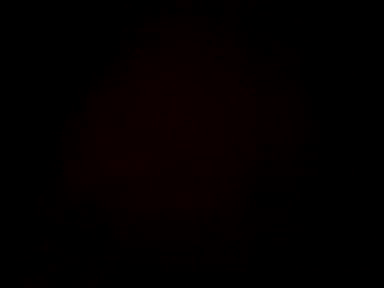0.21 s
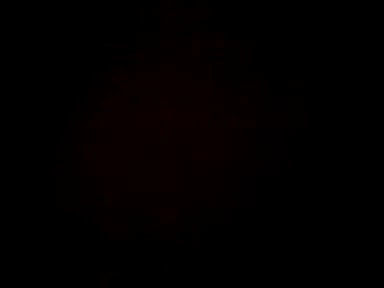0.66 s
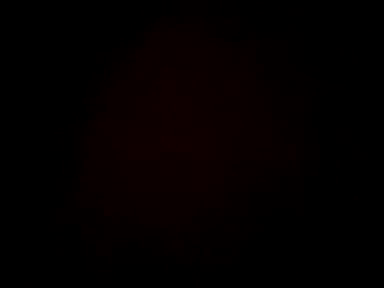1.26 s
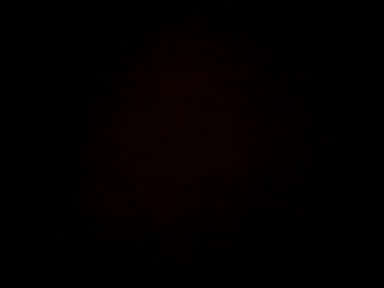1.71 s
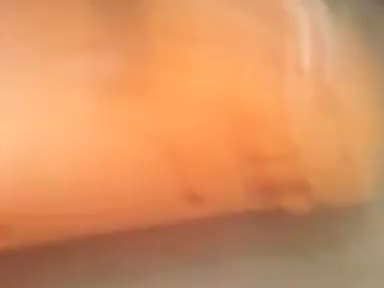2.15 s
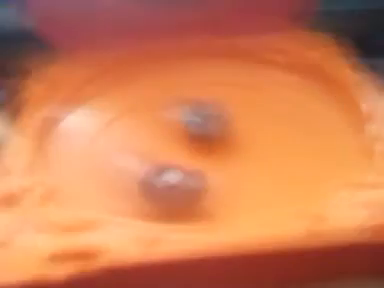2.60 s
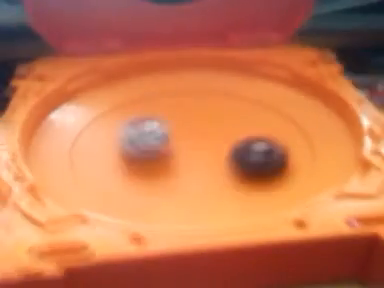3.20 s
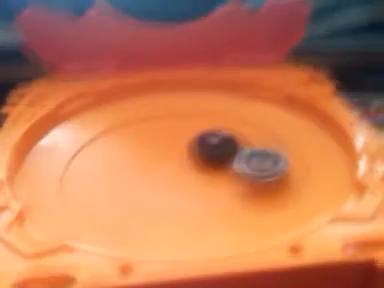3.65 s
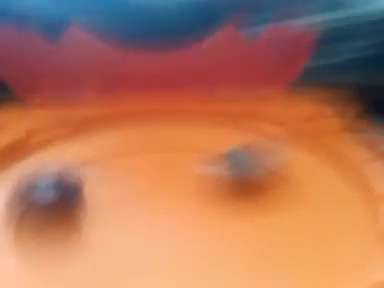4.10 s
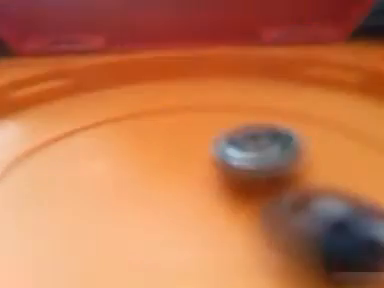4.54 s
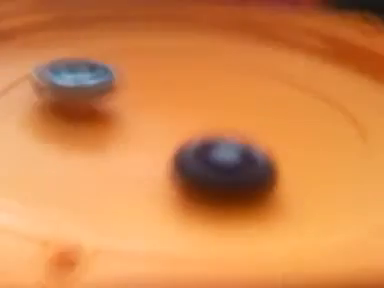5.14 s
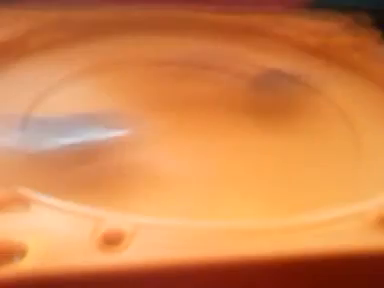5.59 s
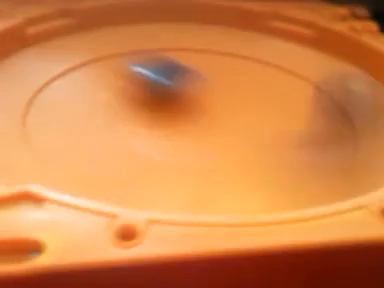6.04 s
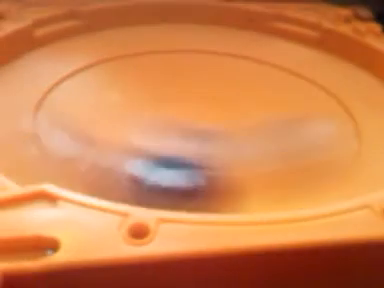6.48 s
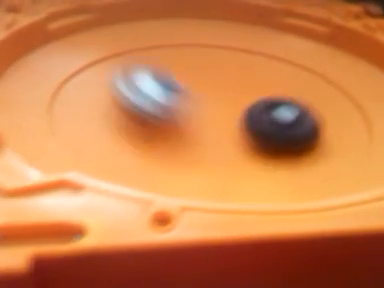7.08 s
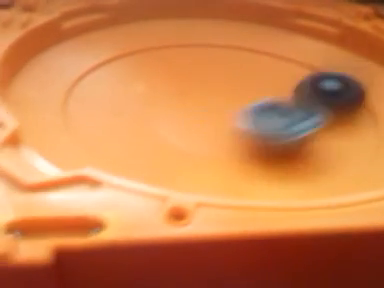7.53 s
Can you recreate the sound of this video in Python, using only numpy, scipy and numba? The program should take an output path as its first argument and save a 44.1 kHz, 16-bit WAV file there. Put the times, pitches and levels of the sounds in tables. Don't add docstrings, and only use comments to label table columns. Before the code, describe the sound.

After a near-silent half second with faint launcher clicks and a short ripcord zip, two metal tops slam into a thin plastic bowl. Dense, hollow clattering lasts about two seconds, then eases into light bounces and a low fluttering whirr. Metal rims clash again in sharp bursts, heaviest past the middle, before rolling with small taps. Small dry room, close muffled microphone, loud hits clipping.

```python
import sys
import numpy as np
from scipy import signal
from scipy.fft import rfft, irfft
from scipy.io import wavfile
from scipy.ndimage import uniform_filter1d
from numba import njit

SR = 44100
rng = np.random.default_rng(int(sys.argv[2]) if len(sys.argv) > 2 else 0)


def master(y):
    cut = np.clip(np.atleast_2d(y).T, -1, 1)
    pcm = np.round(cut * 32767)
    wavfile.write(sys.argv[1], SR, pcm.astype(np.int16))


def volts(x):
    e = np.asarray(x, float) / 20
    return 10 ** e


N = 342657


def level(x, db):
    return x * volts(db) / np.sqrt(np.mean(x ** 2))


def curve(table):
    s, *columns = np.transpose(table)
    return [np.interp(np.arange(N) / SR, s, column) for column in columns]


def ring(x, hz, width):
    hz_in_range = np.clip(hz, 50, 8000)
    return signal.lfilter(*signal.iirpeak(hz_in_range, max(hz / width, .3), fs=SR), x)


def coloured(points):
    hz, db = np.transpose(points)
    f = np.arange(1, N // 2 + 2) * SR / N
    gain = volts(np.interp(np.log(f), np.log(hz), db))
    return level(irfft(rfft(rng.standard_normal(N)) * gain, N), 0)


def walk(rate):
    k = int(SR / rate)
    held = np.repeat(rng.standard_normal(N // k + 1), k)
    return 1.3 * uniform_filter1d(uniform_filter1d(held, k), k)[:N]


@njit
def svf(x, hz, width):
    y, b, l = np.empty(len(x)), 0., 0.
    for i in range(len(x)):
        g, k = np.tan(np.pi * hz[i] / SR), width / hz[i]
        v = (b + g * (x[i] - l)) / (1 + g * (g + k))
        b, l, y[i] = 2 * v - b, l + 2 * g * v, k * v
    return y


LAUNCH_S = .61
MEET_S = 2.6

# start in seconds, peak in dB, bowl ring in Hz, metal share in dB, contact length in ms.
SLAMS = [(.619, 4.5, 404, -3, 14), (.657, 2, 613, -4.5, 4.7), (.686, -8, 276, -5.5, 9.3),
         (1.003, -2.2, 700, -4, 14.4), (1.061, 2.5, 670, -3.5, 13), (1.079, 5, 922, -11, 19),
         (1.14, -4, 324, -29, 12.5), (1.212, -1.5, 400, -15, 9.4), (1.232, 4.5, 720, -6, 18),
         (1.254, 1, 1010, -20.5, 9.2), (1.4, 2, 820, -20, 17), (1.442, 5.5, 703, -20, 9.7),
         (1.538, -6, 625, -3, 15), (1.581, 1.5, 730, -0.9, 9.9), (1.649, 3, 904, -11.5, 19.8),
         (1.672, -5, 600, 4, 3.8), (1.785, -1.4, 480, -34.5, 10), (1.877, -11, 382, -18, 27),
         (1.93, 4.5, 613, 6.5, 21.4), (2.11, -3, 493, -3.5, 14.8), (2.266, -2.5, 404, -9, 12.9),
         (2.347, -6, 1096, 3, 9.2), (2.353, 4.5, 953, 0, 9.7), (2.485, -3.5, 705, -0.5, 13)]
# start in seconds, peak in dB, bowl ring in Hz, metal share in dB, contact length in ms.
CLASHES = [(3.903, -5.5, 450, 1, 7.1), (3.966, -3.1, 567, 1, 11.9), (4.472, -7, 403, 9.5, 7.7),
           (4.535, -1, 1000, -8, 9.5), (4.584, -5.5, 990, -0.5, 7.1), (4.622, -8, 362, -3, 14),
           (4.83, -4, 480, 1.5, 7.1), (5.298, -4.5, 490, -12, 10), (5.338, -6, 555, 0.5, 16.5),
           (5.368, -1.3, 1007, -15, 13), (5.397, 0, 537, 5, 9.5), (5.448, -4.5, 434, 5.5, 11.6),
           (5.48, 2.5, 554, -12.5, 4.7), (5.571, -0.5, 561, -22, 5.1), (5.582, -1, 590, -20.5, 7.6),
           (5.665, -.5, 560, -9.5, 8), (5.793, -3.5, 408, 3, 11), (5.837, -3, 1256, -10, 5.8),
           (5.882, -6.5, 907, -3.5, 24), (5.9, 1.5, 895, -22.5, 11), (5.98, -4, 536, -26, 11.2),
           (6.08, -4, 434, -5, 10.2), (6.1, 2, 556, -20.5, 10.2), (6.181, -0.15, 835, -15.5, 8)]
# start in seconds, peak in dB, bowl ring in Hz, metal share in dB.
SKIPS = [(0.648, -18.5, 1124, -12), (.722, -6.5, 694, -35), (.759, -4.5, 676, -1.5),
         (.803, -10.5, 720, -12), (.823, -11, 630, -27), (.859, -4.5, 734, -27), (.886, -4.5, 706, -11),
         (.91, -10.5, 720, -17), (.946, -13.5, 720, -26), (1.198, -19.5, 910, 6.5),
         (1.037, -7.5, 372, -11.5), (1.047, -10, 793, -31.5), (1.273, -6, 463, -19), (1.288, -13, 960, -7),
         (1.316, -9.5, 457, -6), (1.344, -6, 327, -1.5), (1.374, -10, 840, -3), (1.476, -5.5, 720, -22),
         (1.595, -1.5, 1110, -12), (1.616, -5.5, 902, -10), (1.625, -7.5, 877, -2.5), (1.703, -7.5, 675, 9),
         (1.724, -4, 793, -14), (1.758, -7.5, 450, -19), (1.812, -8.5, 443, -29), (1.851, -14, 448, -25.5),
         (1.967, -11, 1380, 5), (1.996, -7.5, 475, -24), (2.054, -17, 620, -5), (2.148, -18, 430, -3)]
# start in seconds, peak in dB, bowl ring in Hz, metal share in dB.
REBOUNDS = [(2.702, -15, 1414, 19), (3.934, -9.5, 400, -5.5), (4.016, -8, 535, -20), (4.06, -5, 368, -39),
            (4.118, -8, 368, -30), (4.498, -12, 316, -6), (4.669, -10, 395, -5.5), (4.699, -13, 408, -2.5),
            (4.876, -8.5, 528, -2.5), (4.926, -20.5, 450, 2), (5.406, -2, 540, 0.5), (5.463, -4.5, 536, 1),
            (5.512, -7.5, 330, -3.5), (5.705, 2, 519, -3), (5.717, -12, 358, -3), (5.849, -3, 490, 2.5),
            (5.99, -.8, 557, -7), (6.025, 1, 586, -9), (6.217, -3, 557, -13), (6.238, -15, 380, 1.5),
            (6.27, -11.5, 365, -12), (6.321, -8.5, 1050, -14), (6.35, -7, 930, -8), (6.566, -9.5, 450, -14),
            (6.699, -13, 560, -8.5), (7.155, -17, 450, -10), (7.291, -15.5, 392, -33),
            (7.45, -14.5, 412, 6), (7.49, -6.5, 544, -8), (7.596, -9.5, 450, -7)]
# start in seconds, peak in
# dB, bowl ring in Hz, metal share in dB.
BOUNCES = [(2.571, -9, 400, -11), (2.63, -9, 430, -9), (2.676, -13, 447, -11), (2.715, -15, 400, -11),
           (2.742, -14, 447, -14), (2.757, -20, 380, -16), (2.773, -18, 466, -14), (2.798, -17, 528, -11),
           (2.819, -24, 455, -16), (2.96, -22, 350, -16), (2.979, -25, 900, -16), (2.997, -24, 950, -16),
           (3.024, -25, 400, -16), (3.062, -28, 514, -14), (3.115, -29, 400, -16), (3.428, -25, 441, -20),
           (3.633, -16, 439, -11), (3.665, -16, 400, -11), (3.696, -15, 431, -11), (3.719, -16, 433, -11),
           (3.743, -19, 380, -11), (3.762, -18, 441, -11), (4.163, -13, 423, -14), (4.192, -15, 366, -14),
           (4.213, -14, 441, -14), (4.233, -15, 361, -14), (4.252, -15, 431, -14), (4.275, -17, 366, -12),
           (4.435, -21, 400, -11), (4.911, -12, 412, -13), (4.949, -14, 400, -15), (4.957, -14, 450, -15),
           (4.987, -13, 415, -17), (5.021, -14, 428, -17), (5.051, -17, 380, -18), (5.124, -20, 371, -11),
           (5.282, -19, 380, -20), (6.752, -23, 350, -8), (7.325, -21, 330, -11), (7.363, -23, 388, -11)]
# start in seconds, peak in dB, bowl ring in Hz.
TOUCHES = [(2.839, -15.5, 684), (2.877, -16, 636), (2.915, -14, 398), (2.942, -22.5, 318),
           (4.307, -18.5, 390), (4.328, -16.5, 497), (4.397, -18, 486), (4.75, -17, 630),
           (4.772, -18.5, 484), (6.3, -17.5, 405), (6.377, -12.5, 390), (6.413, -12.5, 560),
           (6.423, -14, 570), (6.447, -13.5, 380), (6.476, -22, 400), (6.501, -13.5, 580),
           (6.541, -10.5, 380), (6.599, -14, 450), (6.727, -18, 340), (7.003, -23, 1240),
           (6.969, -23, 1200), (7.143, -24.5, 330), (7.178, -25, 368), (7.202, -21.5, 415),
           (7.258, -22.5, 396), (7.525, -15, 420), (7.543, -16.5, 472), (7.624, -17.5, 460),
           (7.648, -20.5, 350), (7.737, -23, 390)]
# start in seconds, peak in dB, ring of the struck spot
# in Hz.
GRAZES = [(.751, -22, 2000), (0.783, -23, 2870), (0.972, -25, 1600), (1.179, -22, 2000),
          (1.305, -12.5, 2150), (1.334, -28, 2200), (1.428, -5, 700), (1.498, -37, 1500),
          (3.468, -28, 2120), (3.635, -24, 3200), (5.353, -4.5, 2590), (5.544, -22.5, 2800),
          (6.202, -15, 2860), (6.583, -19.5, 2460), (6.622, -27, 3200), (6.803, -30, 3000),
          (7.154, -19, 3140), (7.18, -28, 2300), (7.452, -15, 3170), (7.547, -25, 2280), (5.339, -11, 2550),
          (5.398, -9, 1950), (5.408, -10, 2000), (5.449, -11, 2500), (5.667, -9, 2200), (5.838, -10, 2300),
          (4.472, -11, 2400), (4.832, -13, 2250), (3.969, -10, 2500), (2.798, -22, 2000), (5.802, 1, 1400),
          (1.45, 0, 800), (1.155, -12, 1100), (1.57, -16, 1900), (1.835, -17, 900), (1.686, -11, 1300),
          (6.986, -26, 1250), (7.017, -26, 1250), (6.825, -33, 3000), (6.845, -32, 2800), (7.484, -16, 900),
          (6.385, -20, 2300), (3.485, -29, 1100), (3.497, -33, 2100), (3.57, -30, 2050), (.895, -8, 750),
          (1.64, -14, 900), (6.188, -2, 850)]
# start in seconds, peak in dB, metal share in dB.
CLICKS = [
    (0.408, -19, -4),
    (0.459, -26.5, -3),
    (0.486, -29, -3),
    (0.522, -12.5, -44),
    (.55, -20, -1),
    (0.569, -26, -4),
    (0.6, -11, 15.5),
]
CASE_HZ = 820
CLICK_MS, SKIP_MS, REBOUND_MS, BOUNCE_MS, TOUCH_MS, GRAZE_MS = 6.7, 9.5, 8.57, 7.5, 9.3, 9
TOUCH_METAL_DB, GRAZE_METAL_DB = -11, -7.5


def contacts():
    rows = [(s, db, CASE_HZ, metal_db, CLICK_MS) for s, db, metal_db in CLICKS]
    rows += list(SLAMS) + list(CLASHES)
    rows += [(*row, SKIP_MS) for row in SKIPS]
    rows += [(*row, REBOUND_MS) for row in REBOUNDS]
    rows += [(*row, TOUCH_METAL_DB, TOUCH_MS) for row in TOUCHES]
    rows += [(*row, GRAZE_METAL_DB, GRAZE_MS) for row in GRAZES]
    rows += [(*row, BOUNCE_MS) for row in BOUNCES]
    return rows


# frequency in Hz, width in Hz, level in dB.
BOWL = [(235, 30, -14), (450, 130, 7.5), (720, 610, 1.5), (1000, 150, -4), (1350, 280, -14)]


def plate_ring(chatter, s, hz, scatter):
    plate = ring(ring(chatter, hz, 0.29 * hz), hz, 0.93 * hz)
    if s > LAUNCH_S:
        dull = ring(chatter, 800, 1900)
        for (f, width, db), c in zip(BOWL, scatter):
            plate = plate + volts(-13) * volts(db + 6.7 * c) * ring(dull, f, width)
    return level(plate, 0)


PUSH_DB = (-10, -16)


def bowl_push(chatter, s):
    if s <= LAUNCH_S:
        return 0
    return level(ring(ring(chatter, 210, 390), 280, 600), PUSH_DB[int(s > MEET_S)])


# frequency in Hz, width in Hz, level in dB.
RIM = [(1813, 260, 24), (2106, 400, 15), (2600, 450, 10), (2980, 250, 10), (3470, 200, -20)]


def rim_ring(chatter, s, metal_db, scatter):
    lift = (1.187 if s > MEET_S else 1) * (1 + .04 * scatter[7])
    metal = 0
    for (f, width, db), c in zip(RIM, scatter[8:]):
        metal = metal + volts(db + 3.0 * c) * ring(chatter, f * lift, width)
    return level(ring(metal, 2200, 3500), metal_db - 3.0)


def blows():
    rows, places = contacts(), 5
    out, t = np.zeros((places, N + 2048)), np.arange(2048) / SR
    for n, (s, db, hz, metal_db, ms) in enumerate(rows):
        noise, scatter = rng.standard_normal(2048), rng.standard_normal(16)
        u = t / (max(ms - 2.5, 1) / 1000)
        chatter = noise * np.minimum(t / 0.0014, 1) / (1 + u ** 4.88)
        blow = plate_ring(chatter, s, hz, scatter) + bowl_push(chatter, s)
        blow = blow + rim_ring(chatter, s, metal_db, scatter)
        peak = np.abs(uniform_filter1d(blow, size=7)).max()
        i = int((s - .0012) * SR)
        out[n % places, i:i + 2048] += volts(db - 1.5) * blow / peak
    return out[:, :N]


def taps(hz, jitter, scatter_db):
    turns = np.cumsum(hz * (1 + jitter * walk(40))) / SR
    force = volts(scatter_db * rng.standard_normal(int(turns[-1]) + 1))[turns.astype(int)]
    phase = turns % 1
    return force * phase / .11 * np.exp(-phase / .11)


# start in seconds, level in dB, bowl resonance under the tip in Hz,
# bright share in dB, higher plate mode in Hz.
ROLL = [(.62, -26, 412, -16, 1150), (1.0, -33.5, 632, -8.5, 1140), (1.64, -31.5, 450, -12, 1100),
        (2.2, -42, 480, -2.5, 1102), (2.7, -33.5, 419, -11, 1095), (3.0, -37.5, 383, -7.5, 972),
        (3.27, -35.5, 540, -7, 1100), (3.38, -36.5, 514, -14, 1079), (3.48, -43, 343, -1.5, 1060),
        (3.85, -39, 378, -7, 1290), (4.2, -38, 412, -6, 924), (4.45, -32.5, 461, -5.5, 994),
        (5.0, -30.5, 393, -14.5, 1000), (5.27, -36, 384, -6.5, 1000), (6.3, -34.5, 449, -6, 1000),
        (6.85, -34.5, 367, -13.5, 978), (7.0, -34.5, 362, -13, 1238), (7.77, -34, 368, -9.5, 1000)]
# start in seconds, first top in Hz, second top in Hz.
SPIN = [
    (0.6, 85.91, 63.9),
    (3.3, 80, 56.72),
    (7.0, 70.35, 49.5),
    (7.77, 67.5, 47.7),
]
# start in seconds, second top in dB, path roughness in dB.
LEAD = [
    (.6, -8, 6.5),
    (2.7, 0, 6),
    (3.08, 5, 5.5),
    (3.15, -14, 6),
    (4., -8, 6.5),
    (4.9, 0, 6.5),
    (5.1, -14, 6),
    (6.6, -10, 6),
    (6.85, -16, 6),
    (7.77, -14, 6),
]
# frequency in Hz, density in dB per Hz.
SCRAPE = [(35, -52), (60, -16), (530, -1.5), (753, -18.5), (1850, -17), (4300, -37), (5200, -81),
          (8800, -120)]


def rolling():
    db, hz, upper_db, upper_hz = curve(ROLL)
    fast, slow = curve(SPIN)
    second_db, grit_db = curve(LEAD)
    press = taps(fast, .03, 1.3) + volts(second_db) * taps(slow, .04, 2.5)
    press = press / np.hypot(1, volts(second_db))
    grit = (.17 + press) * rng.standard_normal(N)
    knock = level(press - press.mean(), 0) + volts(grit_db) * level(grit, 0)
    hz = hz * (1 + 0.033 * walk(11))
    thud = level(svf(svf(knock, hz, 240.0), hz, 380.0), 0)
    thud += level(svf(svf(grit, .68 * hz, 200.), .68 * hz, 300.), -12)
    upper = level(svf(svf(grit, upper_hz, 220.), upper_hz, 360.0), 0) * volts(1.9 * walk(9))
    high_hz = 1.75 * upper_hz
    upper += level(svf(svf(grit, high_hz, 200.0), high_hz, 500.0), -3.5) * volts(2.5 * walk(9))
    upper += level(ring(ring(grit, 2300, 660), 2600, 900), -8.5) * volts(3.5 * walk(13))
    scrape = coloured(SCRAPE) * (0.08 + press) * volts(0.73 * walk(16))
    bright = signal.lfilter(*signal.butter(1, 3000, fs=SR), upper + level(scrape, 4.8))
    start = np.clip((np.arange(N) / SR - ROLL[0][0]) / 0.0053, 0, 1)
    return start * volts(db) * (thud + volts(upper_db) * bright)


# start in seconds, level in dB.
RIP = [
    (0.53, -60.5),
    (0.616, -8),
    (0.66, -37.5),
]


def ripcord():
    before, after = (RIP[0][0] - .012, -90), (RIP[-1][0] + .012, -90)
    db, = curve([before] + list(RIP) + [after])
    teeth = rng.standard_normal(N) ** 3
    case = ring(ring(teeth, 3100, 900), 2500, 1500) + volts(-7.5) * ring(teeth, 1900, 600)
    return volts(db) * level(case, 0)


# frequency in Hz, 60 dB decay time in seconds.
ROOM = [(100, .3), (400, 0.14), (1000, 0.074), (3000, 0.15)]
ROOM_DB, SLAP_S, SLAP_DB = -14, 0.01, -18.5


def room(places):
    t = np.arange(SR // 2) / SR
    hz, t60 = np.transpose(ROOM)
    tail = 0
    for f in 110 * 2 ** np.arange(0, 5.6, .5):
        band = ring(rng.standard_normal((len(places), len(t))), f, f / 2.5)
        tail = tail + band * volts(-60 * t / np.interp(np.log(f), np.log(hz), t60))
    tail = tail * np.clip(t / 0.0042, 0, 1)
    tail = volts(ROOM_DB) * tail / np.sqrt(np.sum(tail ** 2, axis=1, keepdims=True))
    for k, one in enumerate(tail):
        one[int(SLAP_S * (1 + .13 * k) * SR)] += volts(SLAP_DB)
    echoes = signal.fftconvolve(places, tail, axes=1)[:, :N]
    return (places + echoes).sum(axis=0)


# frequency in Hz, density in dB per Hz.
AIR = [(18, -77.5), (30, -28.5), (186, -2), (222, 4), (414, -11), (886, -3.5), (999, -13.5), (2610, -20),
       (3600, -26), (4680, -68), (7920, -120)]
AIR_DB = -49


def room_air():
    return coloured(AIR) * volts(AIR_DB + 2 * walk(6.6))


def scene():
    places = np.vstack([blows(), rolling() + ripcord()])
    return (room(places) + room_air())[None, :]


def band_limit(x):
    return signal.sosfilt(signal.butter(12, 16490, fs=SR, output="sos"), x)


def record(dry):
    top_hz, dull_hz, bottom_hz, ceiling = 4950, 2720, 80, .71
    x = signal.sosfilt(signal.cheby2(10, 60, top_hz, fs=SR, output="sos"), dry)
    x = signal.sosfilt(signal.butter(4, dull_hz, fs=SR, output="sos"), x)
    x = signal.sosfilt(signal.butter(2, bottom_hz, "high", fs=SR, output="sos"), x)
    mix = np.clip(x, -ceiling, ceiling)
    return band_limit(mix)


dry = scene()
out = record(dry)
master(out)
```